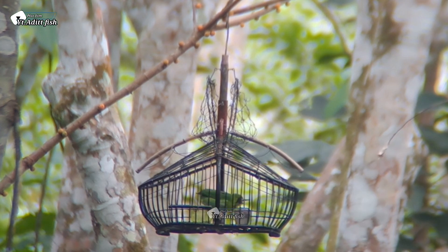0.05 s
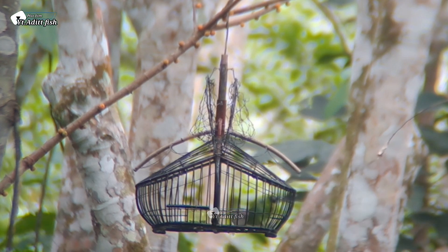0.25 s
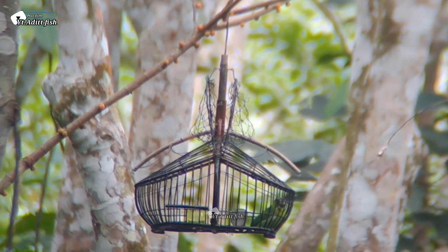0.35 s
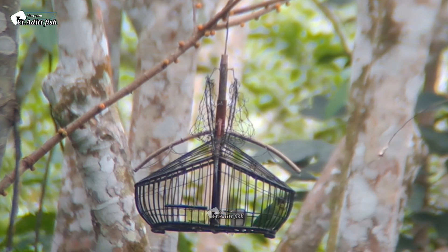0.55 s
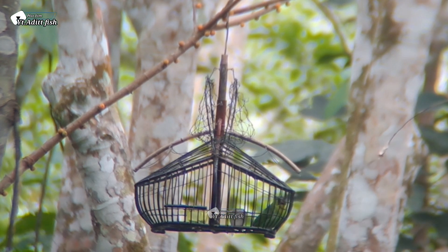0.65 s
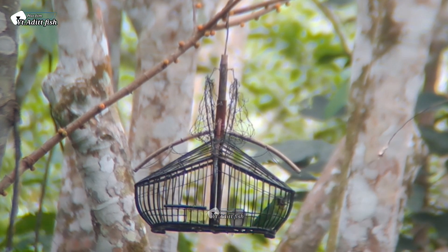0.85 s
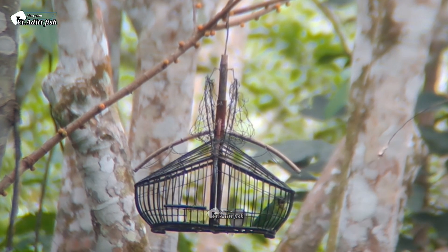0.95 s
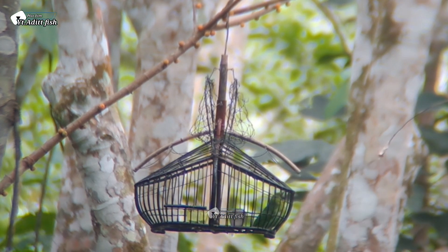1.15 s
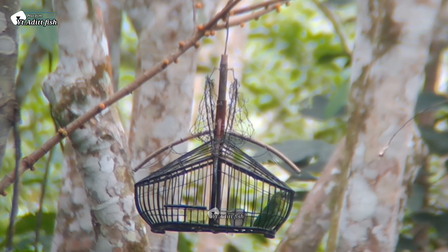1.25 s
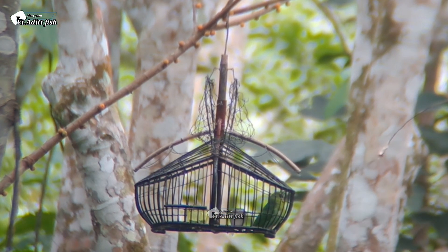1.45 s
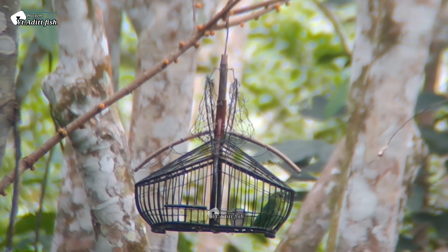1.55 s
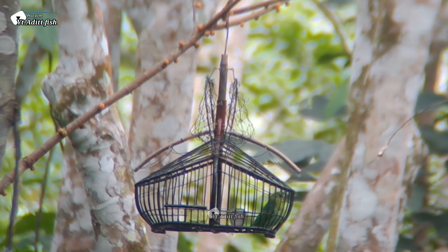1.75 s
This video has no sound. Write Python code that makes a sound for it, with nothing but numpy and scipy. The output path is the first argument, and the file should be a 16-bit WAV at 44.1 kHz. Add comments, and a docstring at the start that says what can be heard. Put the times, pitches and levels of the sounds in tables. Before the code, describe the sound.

A small bird sings eight quick chirped notes close by, over steady high insect buzzing.

```python
"""Caged songbird among trees

Close by, left of the microphones, a small bird in a hanging cage sings eight quick notes: falling slurs,
arched whistles and rising slurs. The two sides of its syrinx sound separately and overlap; trunks and
leaves scatter each note into a tail. Insects buzz steadily near 6 kHz over a faint low hum and still
forest air, and two faint whistles come from far off."""
import sys
import numpy as np
from scipy import signal
from scipy.fft import rfft, irfft, next_fast_len
from scipy.io import wavfile
from scipy.ndimage import uniform_filter1d, minimum_filter1d, map_coordinates

SR = 44100
rng = np.random.default_rng(int(sys.argv[2]) if len(sys.argv) > 2 else 0)


def bounce(signal):
    """Save signal as a 16-bit WAV file at the path given by the first command-line argument."""
    frames = np.transpose(np.atleast_2d(signal))
    limited = np.clip(frames, -1, 1)
    pcm = np.round(limited * 32767).astype(np.int16)
    wavfile.write(sys.argv[1], SR, pcm)


N = 79380

# Whistles, one curve a note. Each point: time in seconds, pitch in Hz, level in dB.
FALLS = [
    [(.221, 3600, -31), (.227, 4115, -18), (.237, 3504, -23), (.246, 3205, -22), (.254, 2937, -20),
     (.270, 2501, -26.5), (.290, 1986, -43.5)],
    [(.790, 4357, -23.5), (.794, 4670, -14), (.803, 3950, -15), (.812, 3406, -22.5), (.826, 2860, -20.5),
     (.845, 2405, -27.5), (.864, 1975, -48.5)],
    [(1.318, 5100, -33.5), (1.328, 4240, -16), (1.335, 3556, -22), (1.346, 3000, -29), (1.360, 2300, -31),
     (1.376, 1835, -42.5)],
]
ARCHES = [
    [(.436, 4150, -23), (.440, 4780, -9), (.447, 5570, -10), (.453, 5420, -10.5), (.461, 5100, -9.5),
     (.472, 4830, -12), (.484, 4780, -14), (.492, 5030, -8), (.498, 5250, -7), (.503, 5520, -16)],
    [(.975, 4350, -23), (.980, 5080, -10), (.986, 5500, -9.5), (.993, 5380, -9), (1.002, 5100, -6),
     (1.012, 4990, -13), (1.022, 5020, -13), (1.030, 5200, -9), (1.038, 5450, -15)],
    [(1.490, 4350, -26), (1.495, 5100, -16), (1.500, 5350, -14.5), (1.511, 5320, -20), (1.519, 5240, -12),
     (1.527, 5230, -19), (1.534, 5620, -9.5), (1.539, 5880, -19)],
]
RISES = [
    [(.615, 3150, -29.5), (.622, 3222, -24), (.632, 3448, -21), (.650, 3508, -22), (.656, 3502, -10.5),
     (.665, 4230, -13.5), (.674, 4810, -19.5), (.680, 4230, -40)],
    [(1.166, 3520, -29.5), (1.178, 3384, -19), (1.190, 3710, -24), (1.199, 4065, -16), (1.208, 4660, -14),
     (1.215, 5002, -16.5), (1.221, 4780, -12)],
]
SECOND_VOICE = [
    [(.215, 3606, -26.5), (.219, 4454, -18.5), (.223, 5245, -21), (.231, 5180, -22), (.235, 5160, -36)],
    [(.427, 4250, -35), (.433, 6030, -17), (.437, 5600, -24)],
    [(.460, 3900, -25.5), (.468, 4250, -22.5), (.487, 4353, -15), (.500, 4780, -17)],
    [(.603, 3230, -27.5), (.611, 3750, -18), (.620, 4100, -21), (.634, 3790, -29)],
    [(.660, 4400, -37), (.672, 5540, -25), (.680, 6170, -20)],
    [(.786, 3900, -23.5), (.791, 5270, -16.5), (.795, 5810, -13), (.801, 5430, -20.5), (.806, 5630, -22)],
    [(.968, 4200, -22.5), (.974, 6260, -15.5), (.978, 5860, -39)],
    [(1.012, 4050, -30), (1.024, 4400, -24.5), (1.034, 4800, -20)],
    [(1.139, 3350, -30), (1.146, 3730, -18), (1.153, 4050, -20), (1.172, 3754, -24.5)],
    [(1.198, 4710, -30.5), (1.213, 6300, -18), (1.219, 6080, -25), (1.224, 5800, -28)],
    [(1.301, 4280, -33.5), (1.307, 5390, -24.5), (1.317, 5000, -18)],
    [(1.482, 4670, -42), (1.488, 6280, -22), (1.492, 5800, -34)],
    [(1.530, 5400, -31), (1.536, 6030, -10.5), (1.541, 5540, -30)],
]  # the other side of the syrinx
FAR_WHISTLES = [
    [(1.06, 1706, -66.5), (1.11, 1693, -62.5), (1.16, 1700, -63)],
    [(1.63, 1066, -62), (1.67, 1110, -64.5), (1.77, 1096, -67)],
]
# Falls, arches, rises and second voice in turn. Each row: overtone gain into the trees in dB, overtone
# gain towards the microphones in dB, attack in seconds, relative pitch roughness per dB of softness.
VOICING = [(5.5, 0, .002, .0016), (2.5, -2.5, .004, .0005), (-1, -18, .021, .0016), (9, -20, .007, .0016)]
# The same four in turn. Each entry: gain straight towards the microphones in dB.
FACING_DB = [-1.3, 1.0, .3, -1.5]
# Paths out of the bird. Each row: frequency in Hz, gain in dB.
THROAT = [(4000, -62), (6500, -1), (7700, -14.5), (8500, -29), (9200, -21), (10000, -26.5), (10900, -26),
          (11700, -33.5), (13500, -23.5), (15200, -28)]  # how the throat passes overtones
FUNDAMENTAL_BEAM = [(2300, -6), (3200, -2), (4200, 0)]  # low pitches spread out, so less comes straight to the microphones
OVERTONE_BEAM = [(8000, 4), (9300, -12), (10600, 1), (11200, -1), (12500, -17)]  # overtones that leave the beak forwards
# Colours of the noises. Each row: frequency in Hz, relative level in dB.
RUMBLE_SPECTRUM = [(25, -27), (42, -2), (55, -4), (85, -8), (115, -15), (150, -20), (260, -22.5),
                   (340, -28.5), (500, -33), (950, -36), (1500, -65), (2500, -45)]
HISS_SPECTRUM = [(500, -4), (1100, 0), (1700, -5), (4000, -8.5), (9000, -15), (15500, -8)]
INSECT_SPECTRUM = [(3900, -47), (4400, -34), (4900, -25.5), (5350, -45), (5750, -29), (6000, -15),
                   (6250, 1), (6600, -6.5), (7100, -15), (7450, -31.5), (8000, -32), (9000, -83),
                   (11500, -52), (13500, -28.5), (15000, -47)]
ONSET_SPECTRUM = [(1500, -25), (2300, -10), (3500, 6), (5500, 7), (7500, -3), (9000, -22), (15000, -24)]
RASP_SPECTRUM = [(1500, -25), (2300, -17.5), (3000, -4.5), (6000, 13), (8500, -13.5), (9800, -3.5),
                 (11000, -2.5), (11800, -15), (13000, -11), (15500, -16)]
# Lines of the low hum. Each row: frequency in Hz, level in dB.
HUM_LINES = [(81, -55.5), (165, -72)]
# Slow swells in the background. Each row: time in seconds, level in dB.
DRONE_SWELL = [(0, -87), (.8, -80), (1.25, -63.5), (1.55, -63), (1.7, -80)]
HISS_SWELL = [(0, 0.5), (.5, 7), (.9, 5.5), (1.25, 7.5), (1.8, 6)]
# The tail among the trees. Each row: frequency in Hz, time to fall 60 dB in seconds.
TREE_DECAY = [(2000, 0.47), (3500, 0.54), (5200, 0.59), (10000, 0.51), (15000, 0.43)]

# Gains at the microphones. Each pair: left in dB, right in dB.
RUMBLE_DB, HUM_DB, HISS_DB, INSECT_DB = [-50, -53], [7.5, -2.5], [-61.5, -63], [-32.5, -51.5]
DIRECT_DB, NEAR_DB, TAIL_DB = [0, -12.5], [-7, -17], [-4.5, -12.5]

EDGE_S = .0017  # a whistle stops this fast
TIME = np.arange(N) / SR


def amp(db):
    """Decibels to gain."""
    return 10 ** (np.asarray(db) / 20)


def unit(x):
    """Scale to rms 1."""
    return x / np.sqrt(np.mean(x ** 2) + 1e-20)


def along(points, hz):
    """Read (Hz, value) points on a log frequency axis."""
    knots_hz, values = np.transpose(points)
    return np.interp(np.log(hz + 1), np.log(knots_hz + 1), values)


def wobble(rate):
    """A smooth random curve, rate knots a second."""
    knots = rng.standard_normal(int(N * rate / SR) + 4)
    return map_coordinates(knots, [TIME * rate])


def filtered(x, response):
    """Filter x by a gain that depends on frequency."""
    size = next_fast_len(N + SR // 2)
    return irfft(rfft(x, size) * response(np.fft.rfftfreq(size, 1 / SR)), size)[..., :N]


def noise(spectrum):
    """Two unrelated noises of rms 1 with the given colour."""
    return unit(filtered(rng.standard_normal((2, N)), lambda hz: amp(along(spectrum, hz))))


def air(width=.53):
    """Still forest air: a low rumble, much alike at both microphones, and a faint swelling hiss."""
    mid, side = noise(RUMBLE_SPECTRUM)
    rumble = unit(np.array([mid + width * side, mid - width * side]))
    hiss = noise(HISS_SPECTRUM) * amp(np.interp(TIME, *np.transpose(HISS_SWELL)))
    return amp(RUMBLE_DB)[:, None] * rumble + amp(HISS_DB)[:, None] * hiss


def hum(drone_hz=247, waver=.01474, swing_db=2.5):
    """Two low lines and a higher drone that comes and goes, all wavering in pitch and level."""
    drone_db = np.interp(TIME, *np.transpose(DRONE_SWELL))
    lines = 0
    for hz, db in [*HUM_LINES, (drone_hz, drone_db)]:
        envelope = amp(db + swing_db * wobble(10.06))
        pitch = hz * (1 + waver * wobble(7.3))
        lines += envelope * np.sin(2 * np.pi * np.cumsum(pitch) / SR)
    return amp(HUM_DB)[:, None] * lines


def insects(flutter_db=.5):
    """A chorus off to the left: a narrow band with a weak octave, fluttering quickly."""
    chorus = noise(INSECT_SPECTRUM) * amp(-flutter_db * wobble(136))
    return amp(INSECT_DB)[:, None] * unit(chorus)


def onset_bursts(below_peak_db=20, half_width_s=.006, lead_s=.003):
    """A short burst of noise at the start of each fall and arch."""
    bursts = 0
    for note in FALLS + ARCHES:
        times, _, db = np.transpose(note)
        burst = np.exp(-((TIME - times[0] + lead_s) / half_width_s) ** 2)
        bursts += amp(db.max() - below_peak_db) * burst
    return bursts * noise(ONSET_SPECTRUM)[0]


def syrinx(curve, attack_s, rough_per_db, loud_db=-6, waver=.003, flutter_db=.8, tilt_db=2.5):
    """One side of the syrinx whistles a gliding tone, rougher when soft and brighter when loud."""
    times, hz, db = np.transpose(curve)
    level_db = np.interp(TIME, times, db)
    softness_db = loud_db - level_db
    roughness = waver + rough_per_db * np.maximum(softness_db, 0)
    glide = uniform_filter1d(np.interp(TIME, times, hz), size=130)
    pitch = glide * (1 + roughness * wobble(700))
    opening, closing = (TIME - times[0]) / attack_s, (times[-1] - TIME) / EDGE_S
    gate = np.clip(np.minimum(opening, closing) + .5, 0, 1)
    envelope = np.sin(gate * np.pi / 2) ** 2 * amp(level_db + flutter_db * wobble(250))
    phase = 2 * np.pi * np.cumsum(pitch) / SR
    fundamental = np.sin(phase)
    beamed = fundamental * amp(along(FUNDAMENTAL_BEAM, pitch))
    overtones = sum(amp(along(THROAT, k * pitch) + tilt_db * (k - 2.5)) * np.sin(k * phase)
                    for k in (2, 3))
    overtones *= amp(-.35 * softness_db)
    return np.sqrt(2) * envelope * np.array([fundamental, beamed, overtones, np.ones(N)])


def bird(rasp_db=-21, rasp_facing_db=-7):
    """The song, with a rasp that follows its level, sent to the microphones and out into the trees."""
    direct = outward = onset_bursts()
    rasp_noise = amp(rasp_db) * noise(RASP_SPECTRUM)[0]
    for notes, facing_db, voicing in zip([FALLS, ARCHES, RISES, SECOND_VOICE], FACING_DB, VOICING):
        spread_db, beam_db, attack_s, rough_per_db = voicing
        whistle, beamed, overtones, envelope = sum(syrinx(n, attack_s, rough_per_db) for n in notes)
        rasp = envelope * rasp_noise
        forward = amp(beam_db) * filtered(overtones, lambda hz: amp(along(OVERTONE_BEAM, hz)))
        direct = direct + amp(facing_db) * (beamed + amp(rasp_facing_db) * rasp + forward)
        outward = outward + whistle + rasp + amp(spread_db) * overtones
    return direct, outward


def forest(direct, outward, near_t60_s=.17, near_delay_s=.004, tail_rise_s=.01):
    """Direct sound from the left, quick echoes off near trunks and a longer tail from the trees."""
    hz, frame_s, spectra = signal.stft(rng.standard_normal((2, SR)), SR, nperseg=256)
    decay = amp(-60 * frame_s / along(TREE_DECAY, hz)[:, None])
    tail = signal.istft(spectra * decay, SR, nperseg=256)[1][:, :SR]
    t = np.arange(SR) / SR
    tail *= 1 - np.exp(-t / tail_rise_s)
    spikes = rng.standard_normal((2, SR)) ** 3  # cubing makes single echoes stand out
    near = spikes * amp(-60 * t / near_t60_s) * (t > near_delay_s)
    echoes = sum(amp(db)[:, None] * path / np.linalg.norm(path, axis=1, keepdims=True)
                 for path, db in [(tail, TAIL_DB), (near, NEAR_DB)])
    scattered = signal.fftconvolve(outward[None], echoes, axes=1)[:, :N]
    return amp(DIRECT_DB)[:, None] * direct + scattered


def distant_whistles():
    """Two faint whistles from far off, fundamental only, equal at both microphones."""
    return sum(syrinx(note, attack_s=EDGE_S, rough_per_db=.000514)[0] for note in FAR_WHISTLES)


def scene():
    """The bird close by among the trees, with insects, air, hum and far whistles behind it."""
    return forest(*bird()) + insects() + air() + hum() + distant_whistles()


def record(dry, ceiling=.95, limiter_s=.004, top_hz=15700):
    """A fast limiter holds the loudest peaks; nothing is kept above the band limit."""
    size = int(limiter_s * SR)
    needed = ceiling / np.maximum(np.abs(dry).max(axis=0), ceiling)
    gain = uniform_filter1d(minimum_filter1d(needed, 2 * size), size)
    return filtered(dry * gain, lambda hz: hz < top_hz)


dry = scene()
out = record(dry)
bounce(out)
```